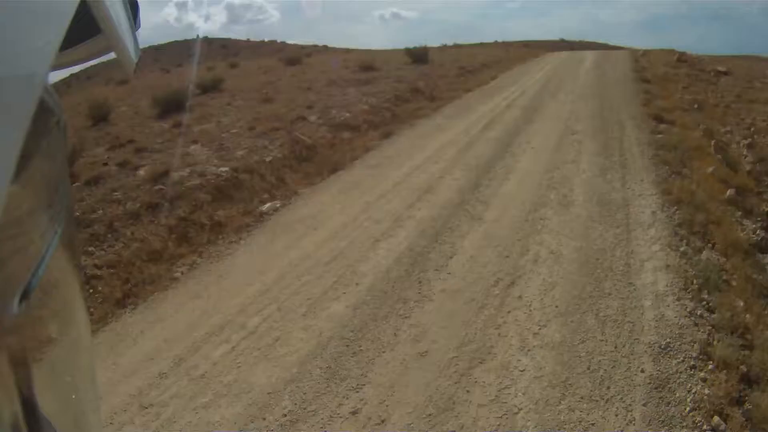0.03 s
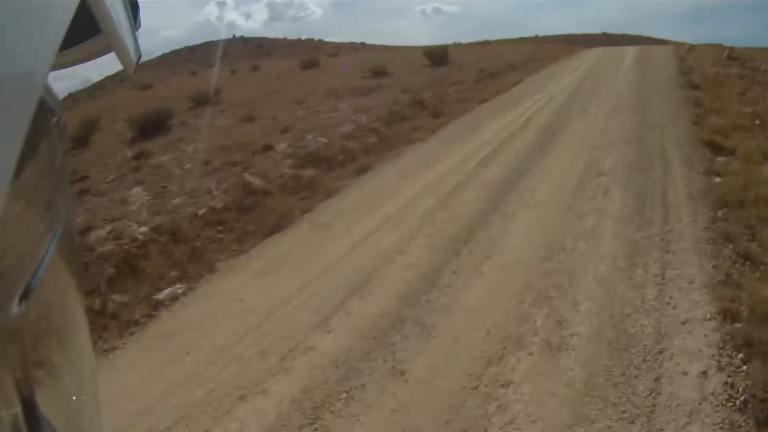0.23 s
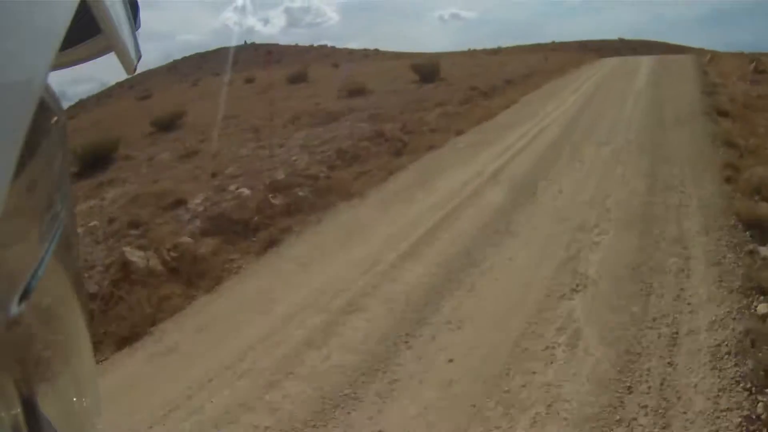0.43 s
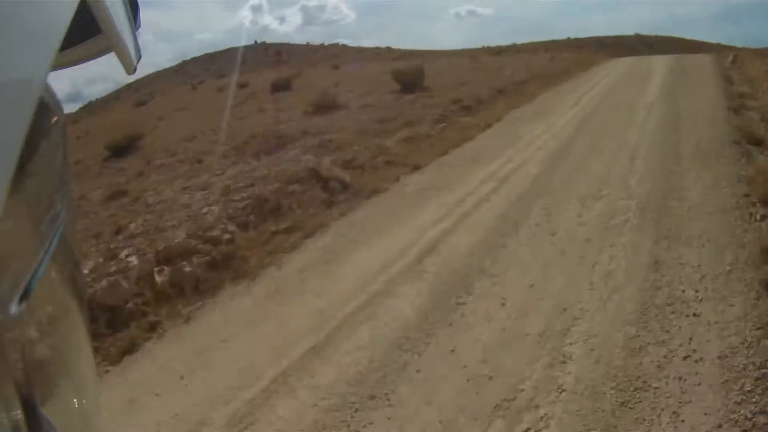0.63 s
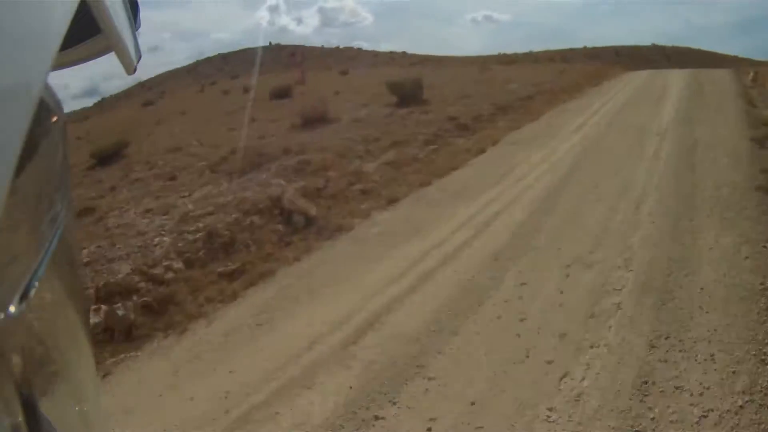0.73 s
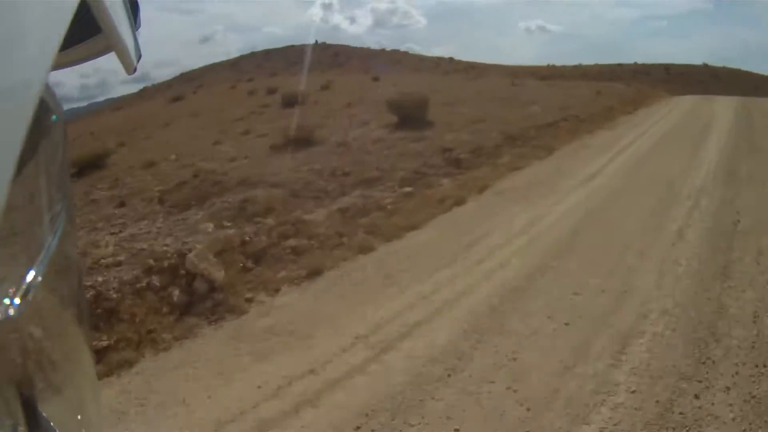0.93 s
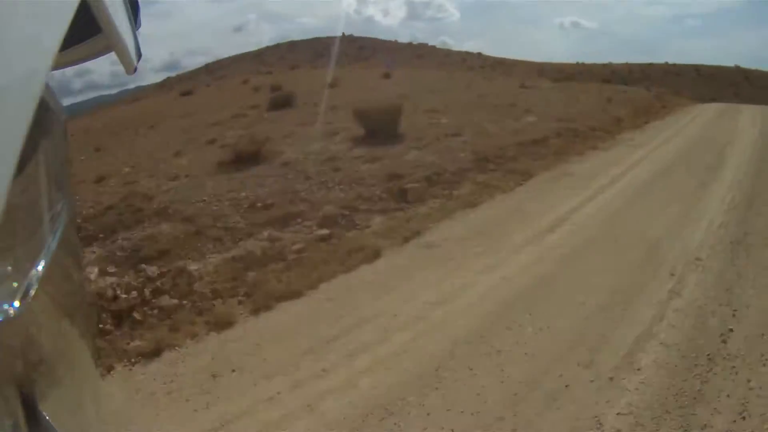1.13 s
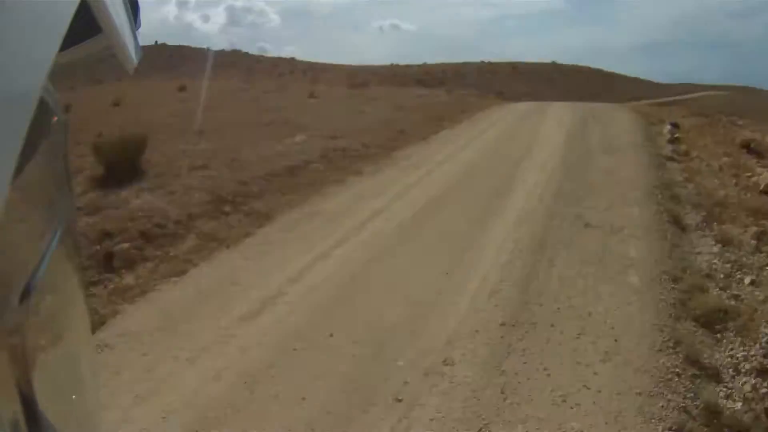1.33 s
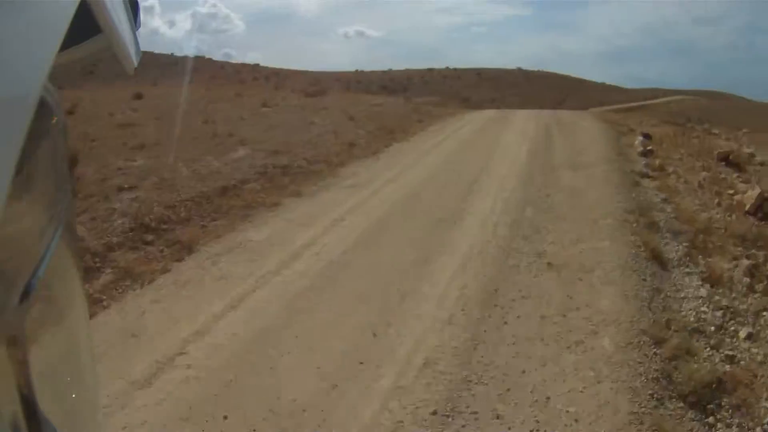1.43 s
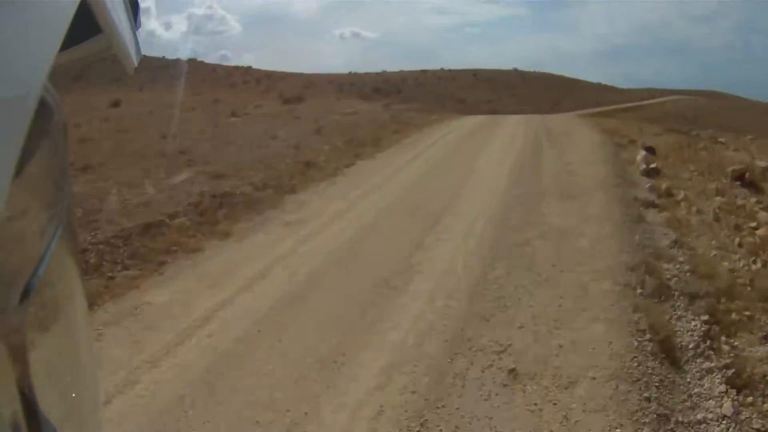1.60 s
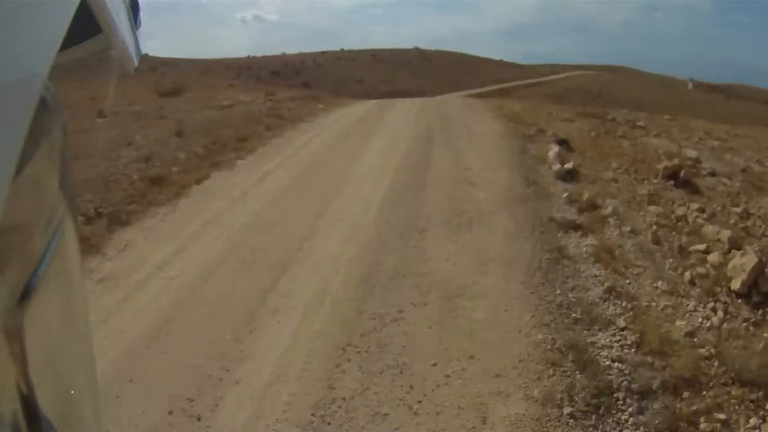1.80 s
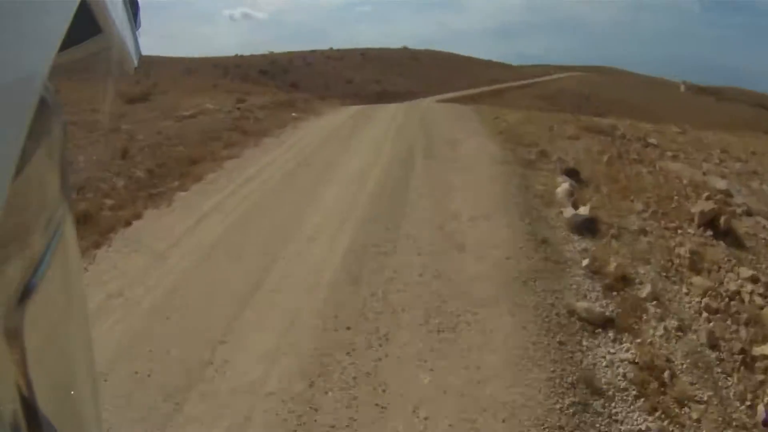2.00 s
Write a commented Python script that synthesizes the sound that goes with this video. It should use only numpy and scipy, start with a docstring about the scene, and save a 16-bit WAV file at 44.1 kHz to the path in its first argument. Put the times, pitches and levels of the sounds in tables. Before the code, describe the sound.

A single-cylinder motorcycle engine thuds and clatters close by on an open dirt track, its revs wavering, rising, then dropping, while wind rushes over the rider's microphone and bumps knock the bodywork.

```python
"""Motorcycle on a dirt track

A single-cylinder engine runs close to a microphone on the rider. Each firing is a thud of pulse and noise.
Noise taps make the valve clatter; sine waves locked to the engine make pipe boom, gear whine and chain song.
Noise puffs make the intake gulp. Bumps knock as filtered clicks, loose parts rattle and a panel hums.
Wind is noise that swells and sinks unevenly; gravel is a crowd of tiny random clicks in patches.
"""
import sys
import numpy as np
from scipy import signal
from scipy.fft import rfft, irfft
from scipy.io import wavfile
from scipy.ndimage import uniform_filter1d

SR = 44100
rng = np.random.default_rng(int(sys.argv[2]) if len(sys.argv) > 2 else 0)


def dump_mix(stems):
    """Bounce the given channels to the path in sys.argv[1] as a 16-bit WAV at rate SR."""
    frames = np.atleast_2d(stems).T  # one column per channel
    limited = np.clip(frames, -1, 1)  # hard clip at full scale
    pcm = np.round(limited * 32767).astype(np.int16)
    wavfile.write(sys.argv[1], SR, pcm)


N = 90625  # length [samples]


def undb(db):
    """Turn decibels into an amplitude factor."""
    return 10 ** (np.asarray(db) / 20)


def unit(x):
    """Scale a sound to an average (RMS) strength of 1."""
    return x / np.sqrt(np.mean(x ** 2))


def curve(rows):
    """Draw straight lines through (time [s], value) points."""
    times, values = np.array(rows).T
    return np.interp(np.arange(N) / SR, times, values)


def walk(rate_hz):
    """Smooth random motion of RMS 1: noise averaged twice over 1 / rate."""
    width = max(int(SR / rate_hz), 1)
    smooth = uniform_filter1d(rng.standard_normal(N), width)
    return unit(uniform_filter1d(smooth, width))


def colour(x, points):
    """Filter through (frequency [Hz], level [dB]) points, with no sound ahead of its cause."""
    size = 4096
    hz, db = np.array(points).T
    grid = np.maximum(np.arange(size // 2 + 1) * SR / size, 1)
    gain = undb(np.interp(np.log(grid), np.log(hz), db))
    # Folding the cepstrum forward in time gives the minimum-phase response.
    cepstrum = irfft(np.log(gain))
    cepstrum[1:size // 2] *= 2
    cepstrum[size // 2 + 1:] = 0
    response = irfft(np.exp(rfft(cepstrum)))
    response /= np.linalg.norm(response)  # unit energy
    return signal.fftconvolve(x, response)[:N]


def impulses(times, sizes):
    """Place one click of the given size at each time [s]."""
    out = np.zeros(N)
    at = np.round(np.asarray(times) * SR).astype(int)
    inside = (at >= 0) & (at < N)
    np.add.at(out, at[inside], sizes[inside])
    return out


def bursts(clicks, decay_s):
    """Each click releases a puff of noise that dies away exponentially."""
    envelope = signal.lfilter([1], [1, -np.exp(-1 / (decay_s * SR))], clicks)
    return envelope * rng.standard_normal(N)


TIMING_JITTER_S = .0003


def strokes(cycles, scatter_db):
    """A click of uneven size and timing at every whole cycle."""
    times = np.flatnonzero(np.diff(np.floor(cycles)) > 0) / SR
    late, size = rng.standard_normal((N // 100, 2))[:len(times)].T
    return impulses(times + TIMING_JITTER_S * late, undb(scatter_db * size))


THROB_LAG_CYCLES = .1


def overtone(cycles, order, waver_db, throb_db):
    """A wavering sine at a multiple of the firing rate, swelling just after each firing."""
    throb = np.cos(2 * np.pi * (cycles - THROB_LAG_CYCLES))
    swell = undb(waver_db * walk(21) + throb_db * throb)
    return unit(np.sin(2 * np.pi * order * cycles) * swell)


# How fast the engine fires: (time [s], speed [firings per second])
ENGINE_SPEED = [(.12, 33), (.3, 33.6), (.4, 36), (.5, 30.3), (.64, 32.3), (.73, 35), (.81, 33), (.89, 36),
                (.98, 31), (1.05, 30.8), (1.11, 31.8), (1.15, 33.1), (1.23, 34.8), (1.31, 36.8),
                (1.35, 39.3), (1.44, 40.8), (1.6, 41.5), (1.8, 33), (2.05, 32)]
ALIGNED_FIRING_S = .143  # one firing falls exactly here


def engine_cycles():
    """Add up the engine speed into a running count of firings."""
    cycles = np.cumsum(curve(ENGINE_SPEED)) / SR
    return cycles - np.interp(ALIGNED_FIRING_S, np.arange(N) / SR, cycles)


# Loudness of the exhaust thuds: (time [s], level [dB])
THUD_LEVEL = [(.12, -36), (.17, -36.5), (.24, -35), (.33, -37.5), (.41, -47), (.55, -47.5), (.68, -42.5),
              (.8, -42), (.9, -40.5), (1.05, -46), (1.25, -40), (1.42, -42.5), (1.54, -47.5), (1.85, -43),
              (2.05, -48)]
# Tone of the exhaust thuds: (frequency [Hz], relative level [dB])
THUD_COLOUR = [(40, -30.5), (120, -10.5), (270, 2.5), (430, 0.5), (600, -0.5), (850, -5), (1300, -13.5),
               (2400, -25), (4000, -67.5), (9000, -104)]
# Loudness of the boom in the pipe: (time [s], level [dB])
BOOM_LEVEL = [(.12, -52), (.26, -45), (.33, -47), (.44, -53), (.54, -47), (.6, -53), (.65, -42.5),
              (.7, -53), (.9, -53), (1.02, -47), (1.08, -45), (1.15, -39.5), (1.23, -36.8), (1.29, -37),
              (1.35, -46), (1.44, -46), (1.55, -58), (2.05, -58)]
FIRING_SCATTER_DB = 1.5  # shared with the intake gulps
PUFF_DB, PUFF_DECAY_S = 1, .011  # puff level is relative to the pulses


def exhaust(cycles):
    """Each firing sends a pressure pulse and a gas puff through the silencer; one multiple booms in the pipe."""
    firings = strokes(cycles, FIRING_SCATTER_DB)
    puffs = unit(bursts(firings, PUFF_DECAY_S))
    thuds = unit(colour(unit(firings) + undb(PUFF_DB) * puffs, THUD_COLOUR))
    boom = overtone(cycles, order=8, waver_db=.7, throb_db=1.5)
    return thuds * undb(curve(THUD_LEVEL)) + boom * undb(curve(BOOM_LEVEL))


# Loudness of the valve gear clatter: (time [s], level [dB])
CLATTER_LEVEL = [(.12, -41), (.35, -40.5), (.48, -47), (.61, -42), (.7, -47), (.88, -45.5), (1.03, -40),
                 (1.2, -42), (1.33, -39.5), (1.42, -45.5), (1.52, -47.5), (1.75, -48), (1.9, -46),
                 (2.05, -43)]
# Tone of the engine casing: (frequency [Hz], relative level [dB])
CASE_COLOUR = [(400, -40), (900, -9.5), (1250, 2.5), (1380, -3), (1520, -0.5), (1800, -1.5), (2300, -0.5),
               (2650, -12.5), (3500, -27), (5000, -53.5), (9000, -44), (12500, -57)]
# Loudness of the gear whine: (time [s], level [dB])
WHINE_LEVEL = [(.12, -44), (.15, -39.5), (.24, -39), (.28, -44), (.32, -48), (.38, -60), (2.05, -64)]
TAP_SCATTER_DB, TAP_DECAY_S = 2.5, .0053
CHAIN_WASH_DB = 4  # relative to the taps


def machinery(cycles):
    """Valves and piston tap the casing twice a cycle over a wash of chain noise; a gear whines."""
    taps = unit(bursts(strokes(2 * cycles, TAP_SCATTER_DB), TAP_DECAY_S))
    wash = undb(CHAIN_WASH_DB) * rng.standard_normal(N)
    clatter = unit(colour(taps + wash, CASE_COLOUR))
    whine = overtone(cycles, order=18, waver_db=1.2, throb_db=5)
    return clatter * undb(curve(CLATTER_LEVEL)) + whine * undb(curve(WHINE_LEVEL))


# Loudness of the cam chain singing under load: (time [s], level [dB])
CHAIN_LEVEL = [(.9, -67), (1.05, -49), (1.2, -55), (1.32, -58), (1.42, -70)]


def chain(cycles):
    """Two thin lines sing above the clatter as the revs rise, likely from the cam chain."""
    low = overtone(cycles, order=44, waver_db=6, throb_db=1)
    high = overtone(cycles, order=66, waver_db=4.5, throb_db=2.5)
    return unit(low + high) * undb(curve(CHAIN_LEVEL))


# Loudness of the intake gulps as the throttle opens: (time [s], level [dB])
INTAKE_LEVEL = [(1.05, -56), (1.15, -46), (1.24, -40.5), (1.29, -40), (1.35, -50), (1.5, -59)]
# Tone of the airbox: (frequency [Hz], relative level [dB])
INTAKE_COLOUR = [(50, -22), (125, -6.5), (220, -2), (300, 0), (400, -25), (550, -6.5), (800, -18),
                 (2500, -41), (9000, -95)]
GULP_DECAY_S = .016


def intake(cycles):
    """The airbox gulps a puff of air once a cycle, half a cycle after each firing."""
    gulps = bursts(strokes(cycles + .5, FIRING_SCATTER_DB), GULP_DECAY_S)
    return unit(colour(gulps, INTAKE_COLOUR)) * undb(curve(INTAKE_LEVEL))


# Knocks from bumps in the track: (time [s], strength of the push [dB], centre frequency [Hz])
BUMP_KNOCKS = [(.469, -13, 350), (.534, -14, 290), (.545, -9, 340), (.683, -8, 470), (.777, -13, 450),
               (.808, -12, 400), (.852, -13, 450), (.966, -12, 480), (1.05, -13, 550), (1.096, -11, 520),
               (1.413, -9, 700), (1.424, -4.5, 360), (1.464, -13, 480), (1.656, -15, 360),
               (1.689, -13, 550), (1.799, -13, 750), (1.834, -8.5, 520), (1.893, -3.5, 380)]
# Tone of the bodywork when knocked: (multiple of the centre frequency, relative level [dB])
KNOCK_COLOUR = [(.15, -22), (.5, -9), (1.0, 0), (1.7, -8), (3.0, -21), (5.5, -42), (9.0, -68), (20, -95)]
SHUDDER_DB, SHUDDER_DECAY_S = -4, .006  # shudder energy is relative to the push


def knocks():
    """Each bump gives one hard push and a brief shudder; the bodywork answers around its own pitch."""
    out = np.zeros(N)
    for at, db, centre_hz in BUMP_KNOCKS:
        push = impulses([at], np.ones(1))
        shudder = bursts(push, SHUDDER_DECAY_S)
        shudder /= np.linalg.norm(shudder)
        blow = push + undb(SHUDDER_DB) * shudder
        out += undb(db) * colour(blow, np.array(KNOCK_COLOUR) * [centre_hz, 1])
    return out


# Blows from stones and loose parts, before smoothing: (time [s], level [dB])
RATTLE_BLOWS = [(.216, -62), (.263, -56), (0.445, -48), (.571, -53), (.618, -47.5), (0.631, -58),
                (0.93, -53.5), (1.118, -48.5), (1.42, -59), (1.651, -55.5), (1.713, -60), (1.786, -62),
                (1.971, -46.5)]
# Tone of the rattles: (frequency [Hz], relative level [dB])
RATTLE_COLOUR = [(800, -13), (2200, 12), (3300, 14), (5200, -14.5), (6800, 6), (8300, -2.5), (10000, -14),
                 (12500, -27)]
BLOW_WIDTH_S, RATTLE_DECAY_S = .00084, .011


def rattles():
    """Flung stones and loose parts give short bright bursts of noise with a slightly softened start."""
    times, db = np.array(RATTLE_BLOWS).T
    blows = uniform_filter1d(impulses(times, undb(db)), max(int(BLOW_WIDTH_S * SR), 1))
    return colour(bursts(blows, RATTLE_DECAY_S), RATTLE_COLOUR)


PANEL_AT_S, PANEL_HZ = 1.968, 188
PANEL_SWELL_S, PANEL_DB = .02, -35  # time to the peak, level at the peak


def panel():
    """After the last knock, a body panel hums on one low note that swells and dies away."""
    age = np.maximum(np.arange(N) / SR - PANEL_AT_S, 0)
    swell = age / PANEL_SWELL_S * np.exp(1 - age / PANEL_SWELL_S)
    return undb(PANEL_DB) * swell * np.sin(2 * np.pi * PANEL_HZ * age)


# Loudness of the wind on the microphone: (time [s], level [dB])
WIND_LEVEL = [(.12, -31.5), (.3, -36.5), (.42, -36), (.7, -35), (1.0, -36), (1.12, -36.5), (1.27, -44.5),
              (1.35, -40.5), (1.39, -30), (1.425, -33), (1.45, -36), (1.53, -39.5), (1.6, -37), (1.68, -36),
              (1.76, -38), (1.82, -33.5), (1.9, -34), (1.95, -36), (2.05, -36)]
# Tone of the wind: (frequency [Hz], relative level [dB])
WIND_COLOUR = [(20, -49), (45, -16.5), (70, -11.5), (125, -5), (250, -2.5), (360, 0), (600, -1.5),
               (1000, -8.5), (1500, -9.5), (2200, -18.5), (2900, -29.5), (4200, -55.5), (5500, -49),
               (12000, -71.5)]
BUFFET_HZ, BUFFET_DB = 105, -.1  # slower, very slight unevenness
EDDY_HZ, EDDY_DB = 720, 1.78  # faster unevenness


def wind():
    """Gusts break into buffets and small eddies on the microphone, heard as uneven noise."""
    turbulence = undb(BUFFET_DB * walk(BUFFET_HZ) + EDDY_DB * walk(EDDY_HZ))
    return unit(colour(turbulence * rng.standard_normal(N), WIND_COLOUR)) * undb(curve(WIND_LEVEL))


# Loudness of the gravel under the tyres: (time [s], level [dB])
GRAVEL_LEVEL = [(.12, -51.5), (.34, -54), (.41, -59), (.55, -60), (.63, -56), (.69, -60), (.9, -60),
                (1.04, -58.5), (1.25, -57), (1.32, -55), (1.39, -61.5), (1.47, -62.5), (1.6, -65.5),
                (1.85, -64.5), (2.05, -60)]
# Tone of the gravel: (frequency [Hz], relative level [dB])
GRAVEL_COLOUR = [(1500, -7), (3000, 11), (4100, 5), (4900, -4.5), (5600, -4.5), (6700, 1.5), (8200, -4.5),
                 (9100, -9), (9900, -21), (10900, -16), (12500, -32)]
GRAINS_PER_S, GRAIN_SPREAD_DB = 9000, -.5
PATCH_HZ, PATCH_DB = 65, 1.72


def gravel():
    """Dense grains of random size crackle in patches."""
    chance, push, size = rng.random(N), rng.standard_normal(N), rng.standard_normal(N)
    grains = (chance < GRAINS_PER_S / SR) * push * undb(GRAIN_SPREAD_DB * size)
    patches = undb(PATCH_DB * walk(PATCH_HZ))
    return unit(colour(grains * patches, GRAVEL_COLOUR)) * undb(curve(GRAVEL_LEVEL))


def scene():
    """Engine, track and wind noises add up at one microphone."""
    cycles = engine_cycles()
    engine = exhaust(cycles) + machinery(cycles) + chain(cycles) + intake(cycles)
    bumps = knocks() + rattles() + panel()
    return (engine + bumps + wind() + gravel())[None]


START_S, FADE_S, TOP_HZ = .116, .011, 12500


def record(dry):
    """The microphone opens after a moment with a short fade; the sound fades out briefly at the very end, and
    the top is cut."""
    t = np.arange(N) / SR
    opened = np.clip(np.minimum(t - START_S, t[-1] - t) / FADE_S, 0, 1)
    # Steep low-pass: .2 dB ripple below the limit, 70 dB down above it.
    low_pass = signal.ellip(8, .2, 70, TOP_HZ, fs=SR, output="sos")
    return signal.sosfilt(low_pass, dry * opened)


dry = scene()
out = record(dry)
dump_mix(out)
```